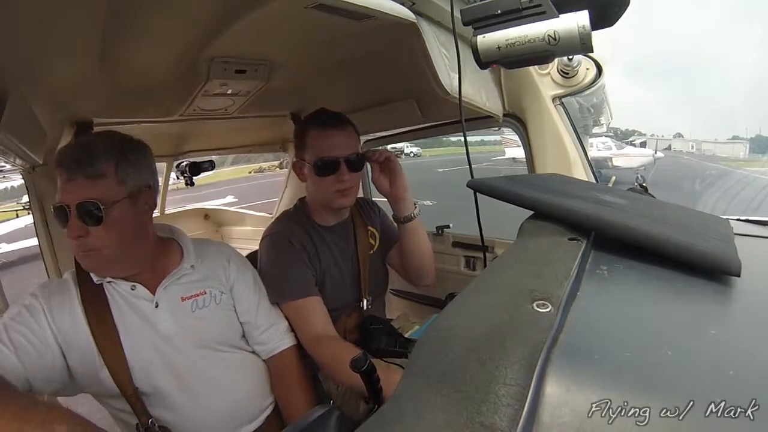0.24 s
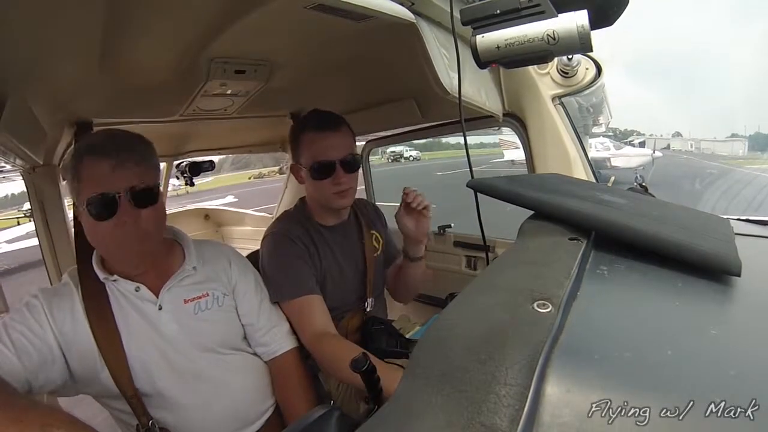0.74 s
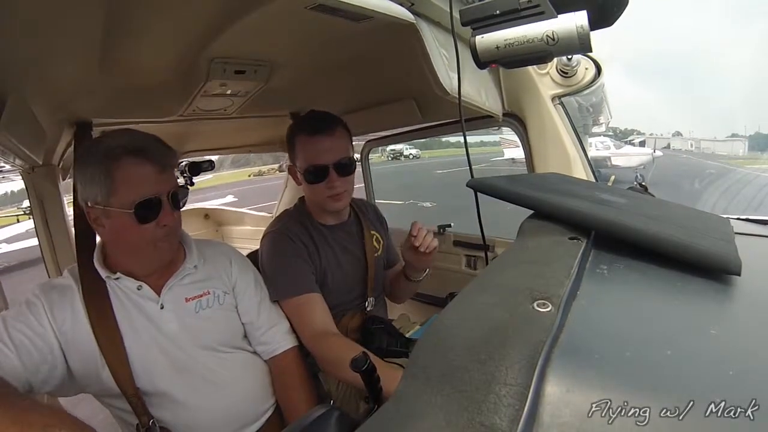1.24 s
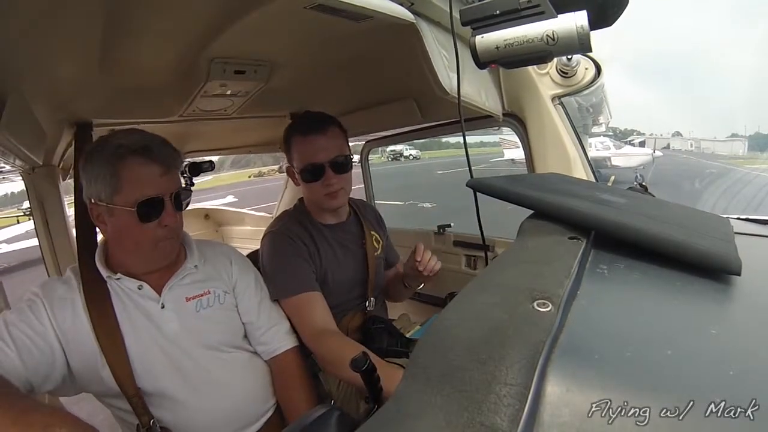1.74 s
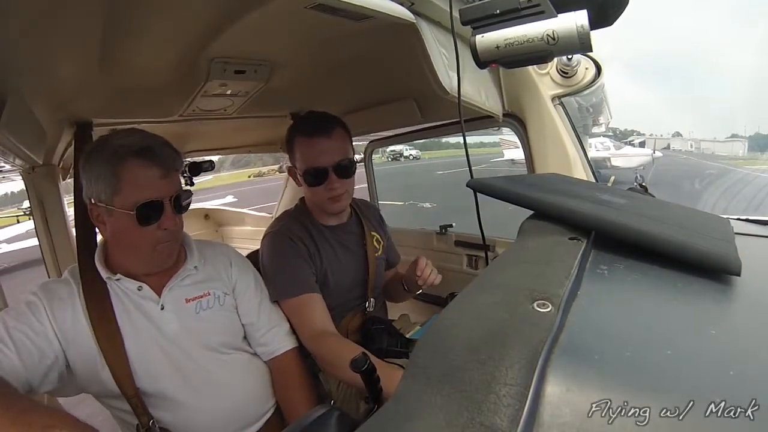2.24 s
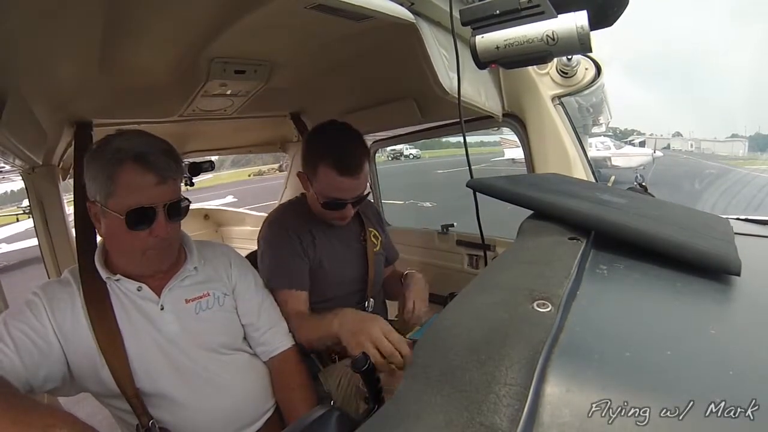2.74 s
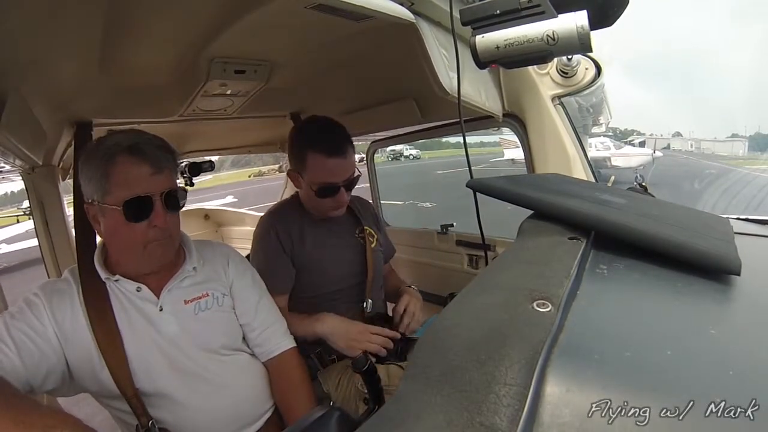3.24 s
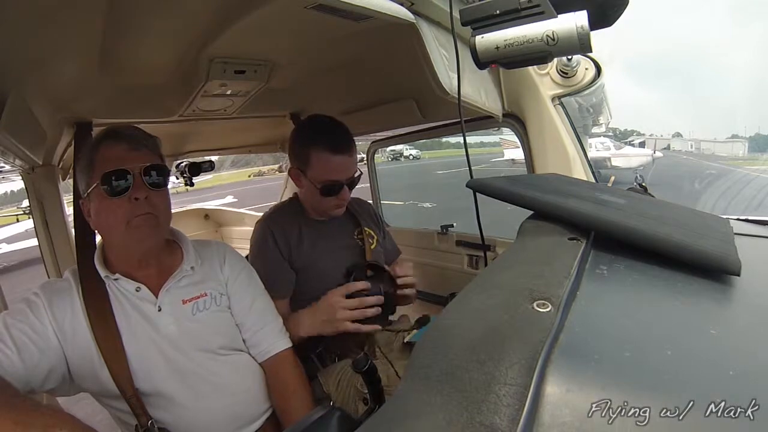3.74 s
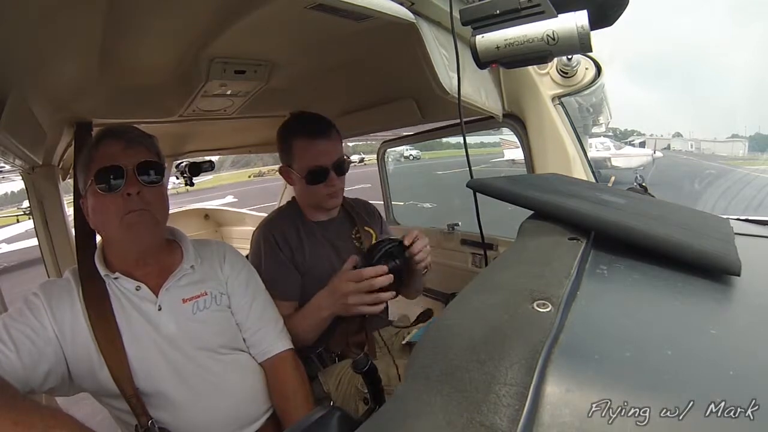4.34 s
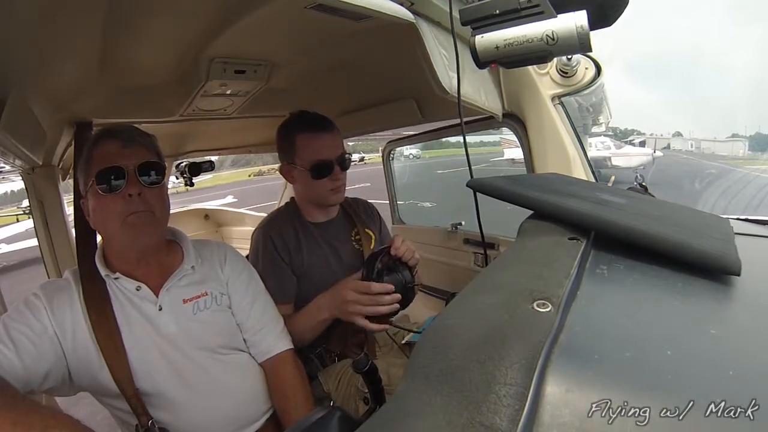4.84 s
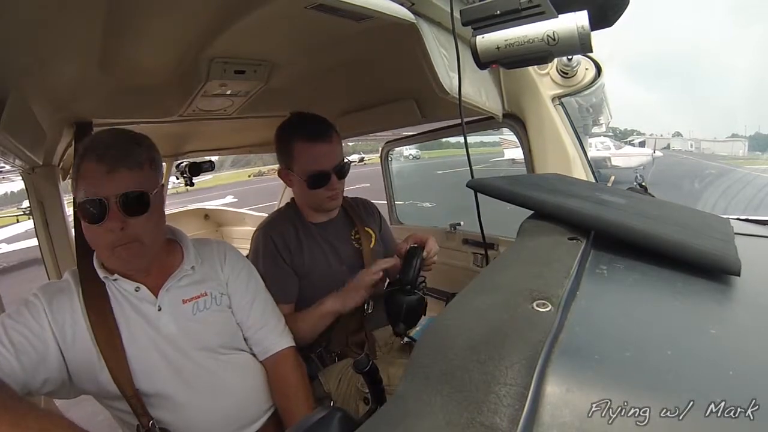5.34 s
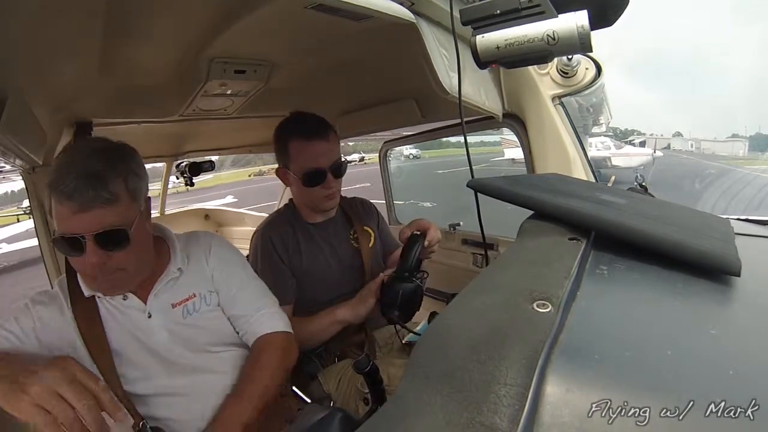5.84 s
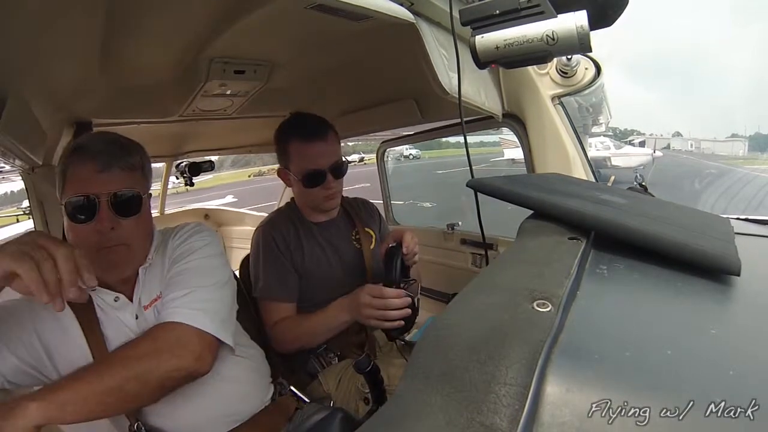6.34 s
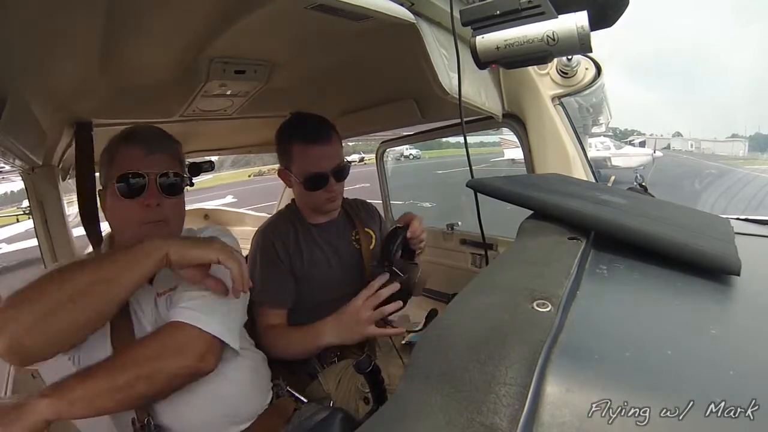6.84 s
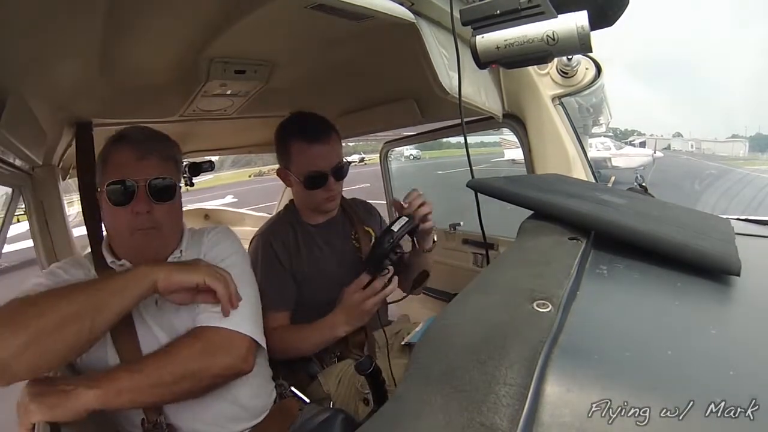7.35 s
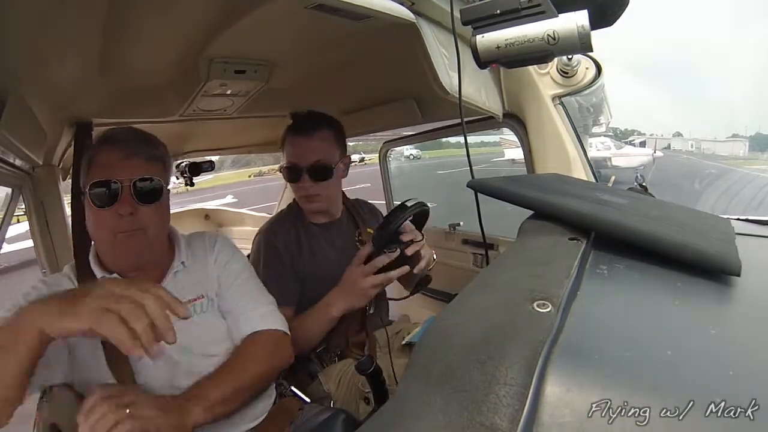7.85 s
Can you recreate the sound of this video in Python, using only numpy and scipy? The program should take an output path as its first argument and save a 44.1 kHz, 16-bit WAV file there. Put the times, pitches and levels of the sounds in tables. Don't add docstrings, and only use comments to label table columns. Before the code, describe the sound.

The whole stretch is dominated by the deep, loud drone of a small piston aircraft engine heard inside its cabin, a pressing boom near 70 hertz with a softer throb an octave below. From 0 to 1.5 seconds the revs climb slightly; the running is rough, the airframe shudders, and loose trim gives frequent little dry rattles. Between 1.5 and 2.4 seconds the engine slows and smooths into idle, wavering slightly to the end. Soft puffing hiss rides on the firing pulses, and a thin whine swells for about 0.7 seconds in every 1.4. From about 3 to 3.8 seconds the muffled propeller roar grows fuller and stays so. Rattles become sparse. At 7.04 seconds a door latch slams once, a low thud with a tight cluster of hard clicks, momentarily ducking the drone. A few faint ticks follow before 8 seconds, with the engine still idling.

```python
import sys
import numpy as np
from scipy import signal
from scipy.io import wavfile
from scipy.ndimage import uniform_filter1d

SR = 44100
rng = np.random.default_rng(int(sys.argv[2]) if len(sys.argv) > 2 else 0)


def to_wav(s):
    ch = np.atleast_2d(s).T
    pcm = np.round(np.clip(ch, -1, 1) * 32767)
    wavfile.write(sys.argv[1], SR, pcm.astype(np.int16))


def ratio_of_db(decibels):
    return 10 ** (np.asarray(decibels, float) / 20)


N = 356769
TIME = np.arange(N) / SR
IDLE_SPEED = 8.75

# (frequency [Hz], width [Hz], level [dB])
TRIM_MODES = [(2977, 110, -3), (3840, 55, -4.5), (4000, 39, -4.5), (4460, 130, -2), (4670, 75, -5),
              (5180, 520, -6)]
# (time [s], level [dB])
LATCH_CONTACTS = [
    (7.0395, 1),
    (7.045, 1),
    (7.0515, -2),
    (7.059, -6),
    (7.065, -8),
    (7.072, -10),
]


def at_hz(points, hz):
    points = np.array(points)
    return np.interp(np.log(hz), np.log(points[:, 0]), points[:, 1])


def rms_one(x):
    return x / np.sqrt(np.mean(x ** 2) + 1e-20)


def ramp(x, start, full):
    return np.clip((x - start) / (full - start), 0, 1)


def drift(rate):
    r = np.exp(-80 * np.pi * rate / SR)
    slow = signal.lfilter([1], [1, -2 * r, r * r], rng.standard_normal(N // 40 + 2002))
    slow = rms_one(slow[2000:])
    return np.interp(np.arange(N) / 40, np.arange(len(slow)), slow)


def wander(unsteady, rate):
    unsteady = np.clip(unsteady, 0, 1)
    loose = drift(rate) + 1j * drift(rate)
    return np.sqrt(1 - unsteady) + np.sqrt(unsteady / 2) * loose


def resonate(x, hz, width):
    r = np.exp(-np.pi * width / SR)
    feedback = [1, -2 * r * np.cos(2 * np.pi * hz / SR), r * r]
    return signal.lfilter(np.array([1, 0, -1]) * (1 - r * r) / 2, feedback, x)


def band_pass(x, order, low, high):
    return signal.sosfilt(signal.butter(order, [low, high], "band", fs=SR, output="sos"), x)


def fade(x, seconds):
    return signal.lfilter([1], [1, -np.exp(-1 / (seconds * SR))], x + 1e-18)


def bands(spectrum, patchy_db):
    # (frequency [Hz], left-right likeness [-1 to 1])
    likeness = [(60, .99), (130, .88), (290, .8), (640, .72), (1400, .36), (2600, -.25), (4500, -.1),
                (9000, .03)]
    # (frequency [Hz], left minus right [dB])
    left_lean = [(250, 2.5), (500, -1), (1000, -.5), (2000, 0.8)]
    edges = np.geomspace(spectrum[0][0], min(spectrum[-1][0], .45 * SR), 13)
    out, white = 0, rng.standard_normal((2, 2, N))
    for k, (low, high) in enumerate(zip(edges, edges[1:])):
        centre = np.sqrt(low * high)
        mid, side = band_pass(white[k % 2], 2, low, high)
        alike = np.clip(at_hz(likeness, centre), -1, 1)
        gain = ratio_of_db(at_hz(spectrum, centre) + patchy_db * drift(11.0))
        gain = gain * ratio_of_db(at_hz(left_lean, centre) / 2 * np.array([[1], [-1]]))
        out = out + gain * (np.sqrt(1 + alike) * mid + np.sqrt(1 - alike) * side * [[1], [-1]])
    return rms_one(out)


def firings(cycle, late, spread_db, rise_s, tail_s):
    cylinder_db = [0.3, -0.2, -0.12, -1.6]
    count = np.floor(4 * cycle - late).astype(int)
    at = np.flatnonzero(np.diff(count)) + 1
    chance_db = spread_db * rng.standard_normal(400)[:len(at)]
    clicks = np.zeros(N)
    clicks[at] = ratio_of_db(np.array(cylinder_db)[count[at] % 4] + chance_db)
    puff = fade(fade(clicks, rise_s), tail_s)
    return puff / puff.mean()


def shudder(uneven_db):
    # (frequency [Hz], level per Hz [dB])
    rumble = [(12, -5), (28, -3), (48, -17), (62, -3.5), (100, -11.5), (170, -26.5)]
    return ratio_of_db(0.56 * uneven_db - 15) * bands(rumble, patchy_db=-3.0)


def hiss(cycle, excess):
    # (frequency [Hz], level per Hz [dB])
    jet = [(1200, -10.5), (2000, -1.5), (3200, -4.5), (4600, -5), (6000, -9), (9000, -11.5), (13000, -19.5),
           (15300, -7.5)]
    noise, white = bands(jet, patchy_db=1.5), rng.standard_normal((2, N))
    for hz, width, db in TRIM_MODES:
        buzz = rms_one(resonate(white, hz, width))
        noise = noise + ratio_of_db(db - 13.5 + 2.7 * drift(2.0)) * buzz
    puffs = firings(cycle, late=0.96, spread_db=2.5, rise_s=0.0045, tail_s=0.0064)
    return ratio_of_db(-38.5 + 4.5 * excess) * rms_one(noise * (0.66 + 0.35 * puffs))


def roar(cycle, excess):
    # (frequency [Hz], level per Hz [dB])
    wash = [(74, -26), (125, -11.5), (150, -5.5), (229, -3.5), (350, -12.5), (642, -8), (809, -13.5),
            (1260, -8.5)]
    # (frequency [Hz], width [Hz], level against the roar [dB])
    panels = [(248, 52, -8), (638, 105, -8.5), (814, 30, -11.5)]
    noise = bands(wash + [(2606, -42)], patchy_db=0.5)
    white = rng.standard_normal(N) + 0.36 * rng.standard_normal((2, N))
    modes = 0
    for hz, width, db in panels:
        modes = modes + ratio_of_db(db + 1.6 * drift(4.1)) * rms_one(resonate(white, hz, width))
    puffs = firings(cycle, late=0.774, spread_db=2.0, rise_s=0.0064, tail_s=0.0074)
    crosswind_db = 5.5 * ramp(TIME, 2.93, 3.8)
    return ratio_of_db(-38 + 4.5 * excess + crosswind_db) * rms_one((noise + modes) * (.47 + .53 * puffs))


def alternator(speed, cycle):
    # (harmonic [number], level [dB], blur [Hz], unsteady share [0-1])
    whine = [(1, -50, 25, .07), (2, -54, 45, .5), (3, -56, 40, .4), (4, -58.5, 55, .5), (5, -61, 65, .5),
             (6, -63.5, 75, .5)]
    lamp_on_s, lamp_period_s, lamp_duty, lamp_db = .83, 1.372, .5, 6.5
    lit = uniform_filter1d(((TIME - lamp_on_s) / lamp_period_s % 1 < lamp_duty) * 1., size=400)
    stray_hz = 8 * drift(20) + 6 * (1 - lit)
    turns = 249.7 * cycle + np.cumsum(stray_hz) / SR
    turns = turns + .055 * np.sin(8 * np.pi * cycle)
    out = np.zeros(N)
    for k, db, blur_hz, unsteady in whine:
        level = ratio_of_db(db + lamp_db * lit / k ** .5 + (6 / k - 2.5) * (speed - IDLE_SPEED))
        out += (level * wander(unsteady, blur_hz) * np.exp(2j * np.pi * k * turns)).real
    return out


def rattles():
    # (time [s], peak level [dB], pitch [Hz])
    knocks = [(0.0578, -23, 4830), (0.1645, -27, 4710), (0.1945, -24, 4750), (0.2418, -29, 3990),
              (0.3496, -22.5, 4420), (0.3745, -24, 3400), (0.4529, -20.5, 4730), (0.4783, -19, 5180),
              (0.6846, -20, 3020), (0.7592, -24, 4840), (0.7861, -21.5, 2980), (1.0126, -24, 3870),
              (1.062, -24, 4710), (1.1638, -24, 4540), (1.1882, -27, 3980), (1.3907, -24, 2960),
              (1.4905, -22, 3000), (1.7968, -21, 3440), (1.8761, -27, 4660), (2.0113, -31, 4730),
              (2.3166, -29, 4580), (4.4653, -28, 4730), (4.8105, -28, 3040), (5.7324, -31, 4000),
              (7.0444, -11.5, 2950), (7.3267, -35, 3100), (7.8106, -26, 3810), (7.834, -30, 3000),
              (7.8935, -25.5, 4000)]
    out, white = np.zeros((2, N)), rng.standard_normal((2, N))
    ringing = rms_one(sum(ratio_of_db(db) * resonate(white, hz, 3.5 * width) for hz, width, db in TRIM_MODES))
    bright = rms_one(band_pass(white, 2, 5500, 13000))
    after = TIME[:3000]
    for s, peak_db, hz in knocks:
        span = slice(round(s * SR), round(s * SR) + len(after))
        own = rms_one(resonate(white[:, span], hz, 260))
        body = (ratio_of_db(-8.5) * own + ratio_of_db(-9) * ringing[:, span]) * np.exp(-after / .014)
        tick_db = min(-14, -35 - peak_db)
        tick = ratio_of_db(tick_db) * bright[:, span] * np.exp(-after / .012)
        out[:, span] += ratio_of_db(peak_db) * (1 - np.exp(-after / .003)) * (body + tick)
    return out


def latch():
    # (frequency [Hz], level [dB], 60 dB decay [s])
    door = [(80, -2.5, .3), (54, -10, .15), (262, -7, .15), (410, -14, .07), (620, -13, .07),
            (980, -16, .05), (1400, -18, .04)]
    at = [round(s * SR) for s, db in LATCH_CONTACTS]
    slam, clicks = np.zeros((2, N))
    slam[at[0] - 70:at[0] + 50] = 1 / 120
    clicks[at] = ratio_of_db(np.array(LATCH_CONTACTS)[:, 1])
    ring = 0
    for hz, db, t60 in door:
        r, w = ratio_of_db(-60 / (t60 * SR)), 2 * np.pi * hz / SR
        struck = slam + (hz > 200) * 0.64 * clicks + 1e-18
        ring = ring + signal.lfilter([0, ratio_of_db(db) * np.sin(w)], [1, -2 * r * np.cos(w), r * r], struck)
    thud = band_pass(rng.standard_normal(N), 2, 300, 1200) * fade(clicks, 0.007)
    body = (ring + ratio_of_db(-5) * thud) * ratio_of_db([[.5], [-2.5]])
    crack = band_pass(rng.standard_normal((2, N)), 1, 1500, 4500)
    return body + ratio_of_db(-10.5) * crack * (fade(clicks ** 2, 0.0036) + ratio_of_db(-23.5) * fade(clicks, .04))


def tone(order, speed, cycle):
    cabin_hz, cabin_q = 70, 2.5
    ratio = order * speed / cabin_hz
    lag = np.arctan2(ratio / cabin_q, 1 - ratio ** 2)
    return np.sqrt(2) * np.exp(1j * (2 * np.pi * order * cycle - lag))


def drone(speed, cycle, uneven_db):
    # (multiple of the cycle, level against the boom [dB], unsteady share [0-1])
    even = [(9.95, -29.5, 0.35), (12.0, -24, 0.12), (16.01, -36.5, 0), (20.06, -40, 0.3),
            (24.06, -36, 0.77), (27.86, -41.5, 0.83)]
    # (multiple of the cycle, level against uneven running [dB], unsteady share [0-1])
    uneven = [(1, -7.5, 0.6), (2, -3, 0.94), (3, -2, 0.83), (5, -22, 0.4), (6, -7, 0.78), (7, -2.5, 0.08)]
    excess = speed - IDLE_SPEED
    boom_db = -9.5 - 0.5 * excess
    firing_db = -19.5 + 2.5 * ramp(speed, 9.64, 9.68)
    out = ratio_of_db(boom_db + 0.37 * drift(13.0)) * tone(8, speed, cycle)
    out += ratio_of_db(firing_db + 1.4 * drift(2.9)) * tone(4, speed, cycle)
    effort_db = 6.5 * excess
    for order, db, unsteady in even:
        out += ratio_of_db(boom_db + db + effort_db) * wander(unsteady, 2.56) * tone(order, speed, cycle)
    for order, db, unsteady in uneven:
        out += ratio_of_db(uneven_db + db) * wander(unsteady, 1.7) * tone(order, speed, cycle)
    return out.real * ratio_of_db([[1.15], [-1.15]])


def from_front(x):
    lag = 7
    return np.array([np.r_[np.full(lag, x[0, 0]), x[0, :-lag]], x[1]])


def scene():
    # (time [s], speed [four-stroke cycles per s])
    throttle = [(0.0, 9.372), (0.27, 9.545), (0.55, 9.728), (0.8, 9.914), (1.1, 9.908), (1.4, 10.011),
                (1.55, 9.843), (2.2, 8.972), (2.45, 8.859), (2.9, 8.824), (3.55, 8.921), (3.72, 8.884),
                (4.12, 8.727), (4.4, 8.711), (5.03, 8.75), (5.46, 8.655), (6.15, 8.798), (8.09, 8.753)]
    speed = np.interp(TIME, *np.transpose(throttle))
    cycle = -.055 + np.cumsum(speed) / SR
    excess = speed - IDLE_SPEED
    uneven_db = -31 + 13 * ramp(speed, 8.95, 9.2)
    engine = from_front(shudder(uneven_db) + roar(cycle, excess) + drone(speed, cycle, uneven_db))
    return engine + hiss(cycle, excess) + alternator(speed, cycle) + rattles() + latch()


def roll_off(x):
    return signal.sosfilt(signal.butter(12, 15500, fs=SR, output="sos"), x)


def record(dry):
    since = np.maximum(TIME - LATCH_CONTACTS[0][0] + .001, 0)
    duck_db = -3.5 * (1 - np.exp(-since / .001)) * np.exp(-since / 0.055)
    flat = dry / (1 + np.abs(dry / 1.15) ** 12) ** (1 / 12)
    low_pass = signal.cheby2(10, 50, 15900, fs=SR, output="sos")
    return roll_off(signal.sosfilt(low_pass, flat * ratio_of_db(duck_db)))


dry = scene()
out = record(dry)
to_wav(out)
```